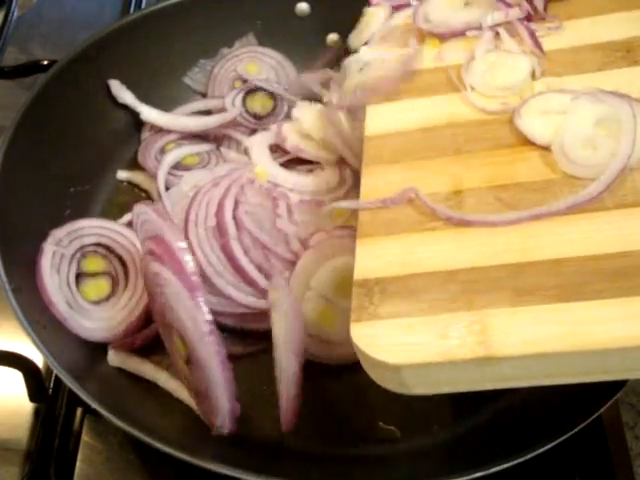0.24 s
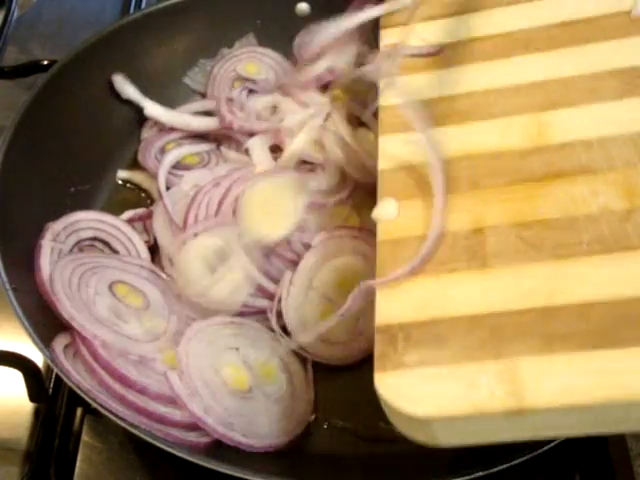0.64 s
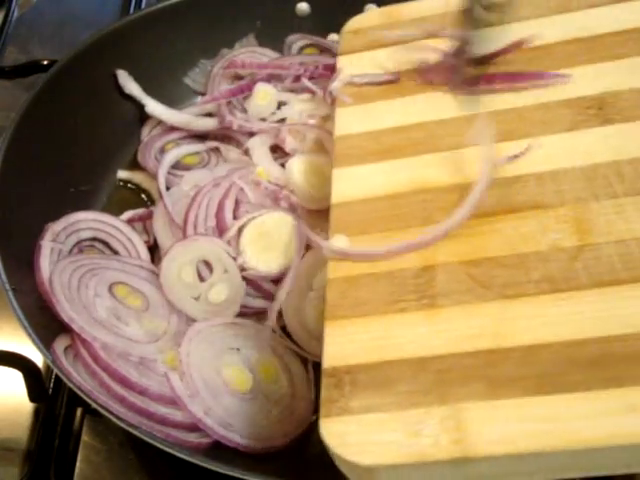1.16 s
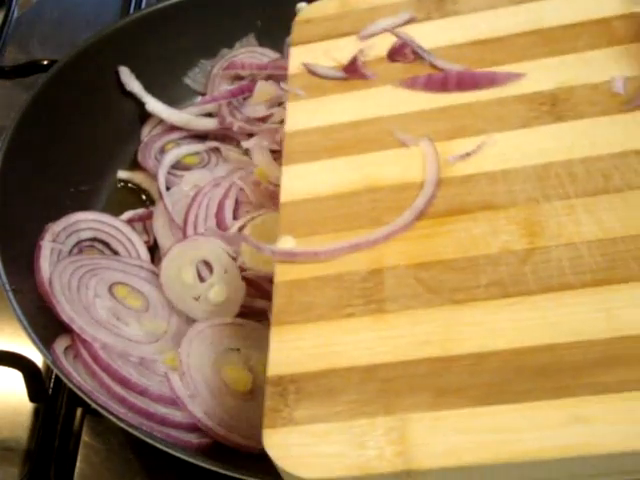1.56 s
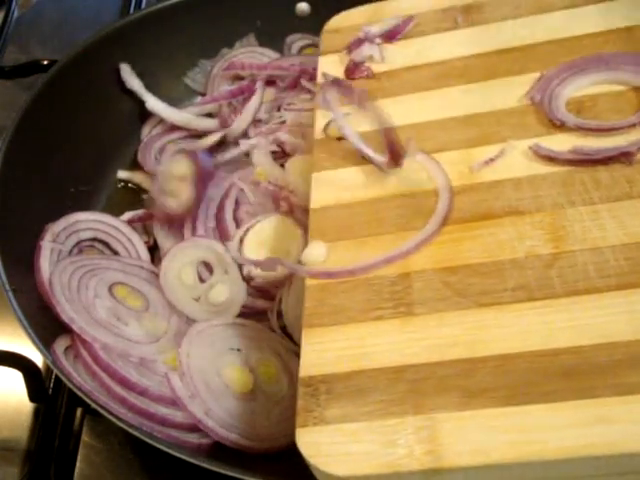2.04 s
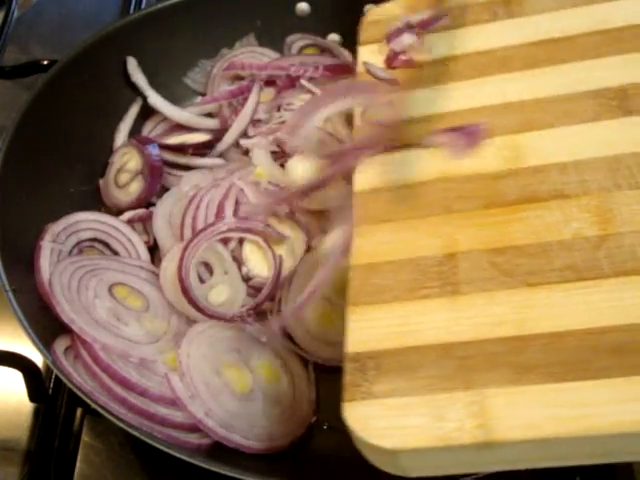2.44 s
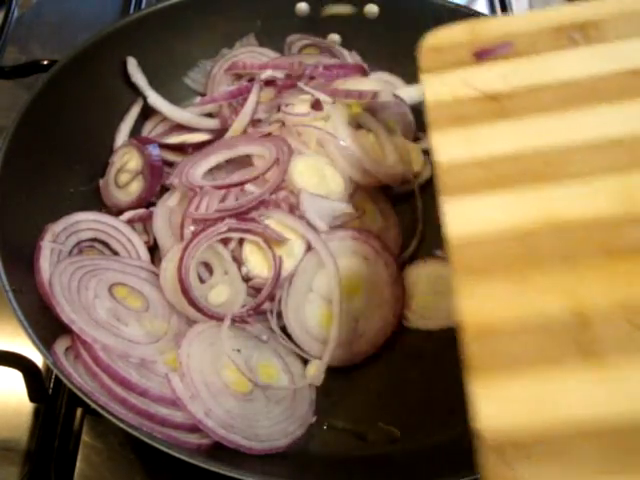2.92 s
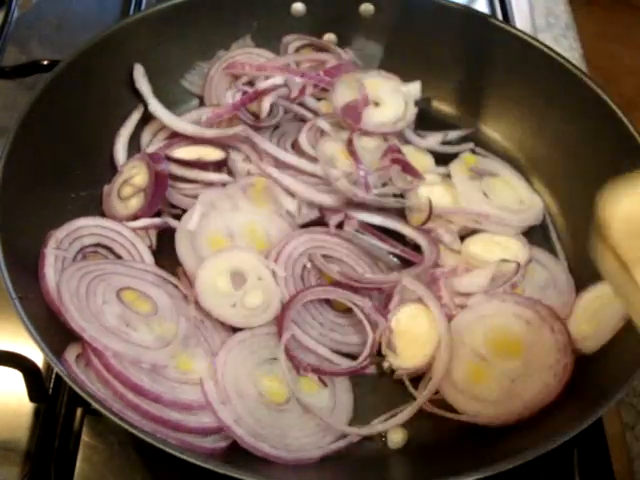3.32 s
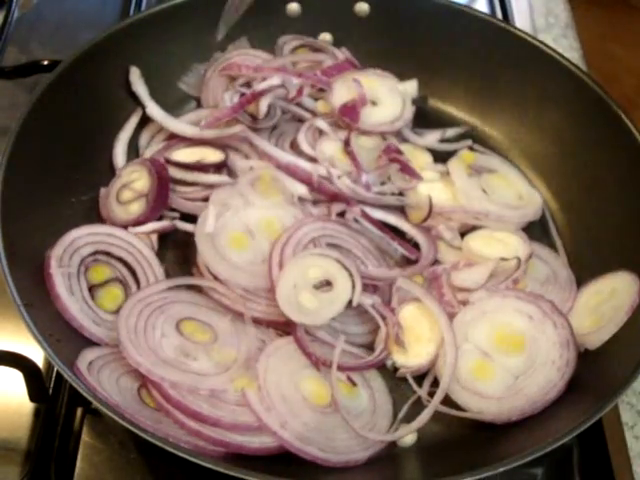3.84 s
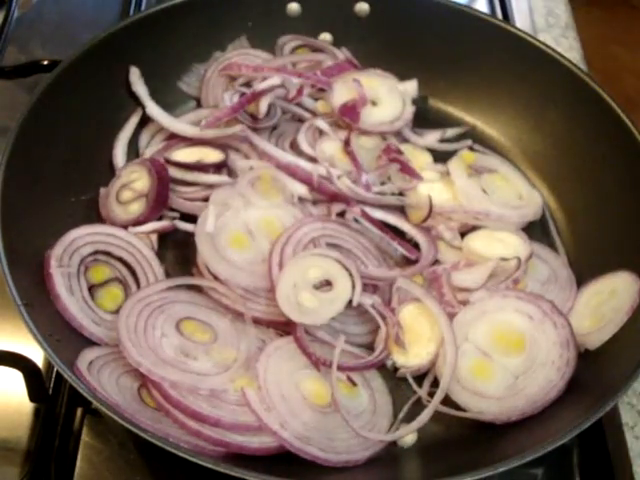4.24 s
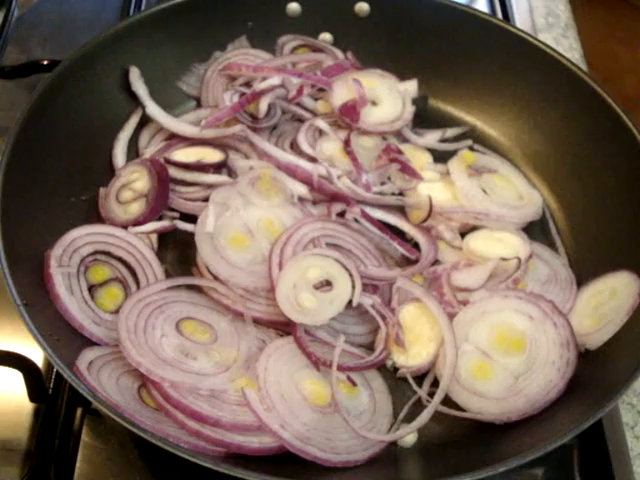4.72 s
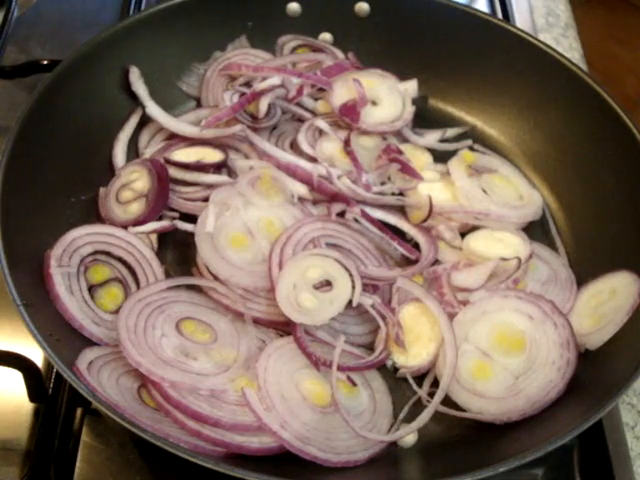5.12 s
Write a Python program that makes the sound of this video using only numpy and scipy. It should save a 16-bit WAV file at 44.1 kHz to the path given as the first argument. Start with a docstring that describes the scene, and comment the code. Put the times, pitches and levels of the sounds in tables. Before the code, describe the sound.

Hot oil sizzles softly throughout, close by in a small kitchen with a faint hush. In the first 0.4 seconds onion slices thump and slide into a frying pan, and around 0.5 seconds a knife knocks and scrapes on a wooden board. A lull follows, with faint scrapes between 1.5 and 2 seconds. From 2.3 to 3 seconds the blade knocks and scrapes loudly along the board in two bursts. Lighter knocks sound in the pan from 3.3 seconds, ending in a sharp strike at 3.7, as the sizzle becomes slightly louder and thinner. A soft swish passes near 4 seconds, then light knife clinks. At 4.7 the board knocks onto the counter and slides to rest, and the knife drags and clinks loudly from 5.1 to 5.4. A faint low ringing and stove rumble lie beneath the opening thumps and closing clatter.

```python
"""Onion slices thump into a frying pan of hot oil, pushed by a knife off a wooden board in a small kitchen.
The blade knocks and scrapes along the board; at the end knife and board are laid on the counter.
Each solid rings in its damped modes, excited by impacts and by the dense slips of friction.
Bursting bubbles make the oil sizzle softly. A low ringing murmur is faint under the sizzle, louder under
the opening thumps and closing clatter. Behind lie a room hush, one soft swish and a rumble of the hob."""
import sys
import numpy as np
from scipy import signal
from scipy.fft import irfft
from scipy.io import wavfile
from scipy.ndimage import uniform_filter1d, minimum_filter1d

SR = 44100
rng = np.random.default_rng(int(sys.argv[2]) if len(sys.argv) > 2 else 0)


def to_wav(sig):
    """Store sig (one row per channel, or 1-D mono) as 16-bit WAV at the path in sys.argv[1].

    Samples outside -1..1 are clipped; the rate is SR.
    """
    pcm = np.clip(np.atleast_2d(sig), -1, 1) * 32767
    pcm = np.round(pcm).astype(np.int16)
    wavfile.write(sys.argv[1], SR, pcm.T)  # frames by channels


N = 236640

# Resonant modes: pitch_hz, width_hz, level_db
PAN_MODES = [(165, 25, -22), (460, 40, -14), (560, 40, -10), (800, 50, 0), (860, 45, -3), (978, 40, -10),
             (1093, 40, -10), (1207, 50, -7), (1310, 50, -13), (2090, 100, -25), (2700, 100, -27)]
BOARD_MODES = [(542.8, 43, 3), (670, 71, -12), (804, 110, -6.5), (933, 140, -4), (1286, 57, 7.5),
               (1596, 26, -2), (2057, 200, -8), (2546, 41, -7), (2917, 240, -9.5), (3800, 390, -21.5)]
KNIFE_MODES = [(1305, 50, 0), (1560, 56, -12), (2050, 70, -9), (2160, 60, -8), (2270, 56, -5),
               (2700, 40, -12), (3090, 70, -7), (3600, 50, -12), (4050, 60, -16), (4550, 80, -17),
               (5190, 100, -21), (6350, 90, -24)]
COUNTER_MODES = [(288, 31, -9), (470.5, 11, 2.5), (893, 100, 1.5), (1274, 120, 4), (1610, 8.5, -23),
                 (2100, 40, 5), (2710, 330, -9), (3270, 110, -23), (3400, 61, -38)]
MURMUR_MODES = [(563, 48, -6.5), (574, 18, -10), (853, 34, 0.5), (1001, 53, -1.5), (1128, 22, -1.5),
                (1227, 150, -1), (2160, 170, -18)]
# Unpitched part of each response: frequency_hz, relative_density_db
PAN_SPECTRUM = [(40, -44.5), (150, -19.5), (311, -10.5), (560, 1.5), (810, -4), (1300, -7.5), (1960, -22),
                (4000, -30), (10000, -53)]
BOARD_SPECTRUM = [(40, -57), (150, -40), (390, -18), (550, -3), (1050, -8.5), (2000, -5.5), (3500, -10),
                  (5800, -18), (7500, -26.5), (10000, -37.5)]
KNIFE_SPECTRUM = [(40, -57), (300, -30.5), (750, -21), (1320, -0.5), (1790, -11.5), (2250, -3.5),
                  (3600, -13.5), (5340, -27), (10000, -46)]
COUNTER_SPECTRUM = [(40, -64), (100, -42), (150, -15), (283, -12), (584, 1.5), (1290, 6.5), (1830, 0),
                    (3200, -8.5), (6590, -31.5), (10000, -47.5)]
# Impacts, brighter for harder contact: start_s, peak_db, spot_pitch_hz, tilt_db_per_octave
PAN_IMPACTS = [(0.024, -17.5, 840, -4.5), (0.12, -21, 860, 3), (.137, -14, 890, 1.5), (.184, -19, 860, 3),
               (.21, -25, 860, -3), (.219, -4, 1150, 1), (.238, -16, 970, -5), (.366, -22.5, 875, 3.5),
               (0.379, -18.5, 885, -2.5), (.769, -30.5, 960, 6), (3.27, -22.5, 860, -6.5),
               (3.381, -13, 900, -0.5), (3.543, -19.5, 1060, 7.5), (3.55, -24, 165, -3),
               (3.693, -27, 820, 6), (3.721, 0.5, 850, 2.5), (3.823, -13, 820, -3.5)]
BOARD_IMPACTS = [(.433, -10, 555, -2), (.46, -8.5, 3370, 2), (.472, -5.5, 1320, 1), (.505, -10.5, 2428, 2),
                 (2.292, -13, 580, -9.5), (2.354, -13.5, 1990, 1), (2.385, -8, 554, -5),
                 (2.391, -1, 1370, -3), (2.42, -3.5, 1330, -4), (2.465, -11.5, 790, -2.5),
                 (2.599, -9.5, 5400, 6), (2.852, -1, 1230, 1)]
KNIFE_IMPACTS = [(3.793, -12, 2940, 16.5), (4.139, -36, 1550, -4), (4.294, -22.5, 1960, 1),
                 (4.411, -14.5, 1960, -3.5), (4.43, -24, 2080, 8.5), (4.601, -22, 4700, 5),
                 (4.619, -23, 2540, -6.5), (4.919, -5, 6300, 15), (5.133, -16.5, 2250, 9),
                 (5.159, -11.5, 1320, 4.5), (5.229, 1, 1270, 1), (5.332, -1.5, 1250, 1.5),
                 (5.348, -5, 3140, 4)]
COUNTER_IMPACTS = [(4.732, 0, 1220, -2), (4.752, -30, 1260, 4), (4.796, -2, 291, -5),
                   (4.919, -9.5, 1400, 3)]
# Sliding contacts: start_s, length_s, first_level_db, last_level_db, tilt_db_per_octave
PAN_STROKES = [(0, 0.078, -32, -34, 3), (0.119, 0.46, -40, -39, -1), (3.2, 0.17, -34.5, -47, 3),
               (3.54, 0.12, -32, -34, 2)]
BOARD_STROKES = [(0.438, 0.08, -19.5, -23, -1), (.525, 0.13, -33, -39, 1.5), (1.55, 0.13, -35.5, -59, -2.5),
                 (1.7, 0.25, -39, -51, -0.5), (2.325, .03, -29, -18.5, -6.5),
                 (2.357, 0.027, -26, -23, -1.5), (2.385, .12, -16, -21, -2.5), (2.5, 0.1205, -21.5, -25, 1),
                 (2.853, 0.0603, -17.5, -18, 2.5), (2.915, 0.06, -18, -38, -2)]
KNIFE_STROKES = [(4.302, 0.089, -35, -49, -1), (4.421, 0.19, -35.5, -43, -0.5),
                 (4.6, 0.084, -38, -51, 12.5), (5.11, .06, -29, -16.5, -1.5), (5.176, 0.0554, -30, -11, -1),
                 (5.235, .09, -16, -25, 2), (5.335, 0.043, -15, -32, 1)]
COUNTER_STROKES = [(4.741, 0.06, -14.5, -24.5, 0.28), (4.797, 0.16, -14.5, -34.5, -2.1),
                   (4.894, 0.28, -17, -37, -1.2)]
# Levels of the sizzle and of the low ringing murmur: time_s, sizzle_db, murmur_db
ENVELOPES = [(0, -43.5, -35.5), (.4, -47.5, -54.5), (1.3, -47, -49), (2.4, -48.5, -53.5),
             (2.8, -47.5, -52.5), (3.1, -45, -49.5), (3.55, -42, -56), (3.68, -36.5, -48.5),
             (4.0, -40.5, -56.5), (4.6, -40, -56.5), (5.37, -43.5, -32.5)]
# Noise spectra: frequency_hz, relative_density_db
BARE_OIL_SPECTRUM = [(880, -20), (1500, 0), (2090, 1), (3580, 0), (5090, 2), (5660, 3), (7500, -3),
                     (10000, -8)]
COVERED_OIL_SPECTRUM = [(820, -53), (1500, -24.5), (2460, -7), (4190, -9), (5300, -4), (6550, -1.5),
                        (8000, -9), (10000, -15.5)]
SWISH_SPECTRUM = [(1060, -21.5), (1800, -5), (2140, 2), (2680, -1.5), (3020, 2), (3630, 3.5), (4320, -8.5),
                  (5000, -12.5), (6500, -49), (11000, -120)]
RUMBLE_SPECTRUM = [(20, -20), (50, -10), (110, -2.5), (165, -2), (260, 2), (400, -36)]
HUSH_SPECTRUM = [(12, -54.5), (20, -62), (287, -9.5), (339, -11.5), (494, -4.5), (736, -9), (853, -4.5),
                 (1220, -13), (1470, -11.5), (3000, -11), (3900, -13), (6600, -120)]
# Reverberation time of the kitchen: frequency_hz, t60_s
ROOM_DECAY = [(150, 0.64), (600, 0.38), (2000, 0.46), (5000, 0.14), (10000, 0.035)]

SPREADING_S = (3.32, 3.61)  # the slices are spread over the oil: start_s, end_s
TAPS = 4096
FILTER_HZ, TIME_S = np.fft.rfftfreq(2 * TAPS, 1 / SR), np.arange(N) / SR


def slices_in_pan():
    """Impact and friction: slices and blade land and slide in the pan, exciting its modes."""
    pan = (PAN_MODES, PAN_SPECTRUM, -6)
    thumps = impacts(pan, PAN_IMPACTS, rattle_t60_s=0.036, looseness=0.06)
    return thumps + friction(pan, PAN_STROKES, slips_per_s=1500, brightening=0.1)


def blade_on_board():
    """Impact and friction: the blade knocks and scrapes, driving the damped modes of the wood."""
    board = (BOARD_MODES, BOARD_SPECTRUM, -6.5)
    knocks = impacts(board, BOARD_IMPACTS, rattle_t60_s=0.036, looseness=0.31)
    return knocks + friction(board, BOARD_STROKES, slips_per_s=5500, brightening=4)


def knife_laid_down():
    """Modal vibration: the knife rings as it touches down and drags on the counter."""
    knife = (KNIFE_MODES, KNIFE_SPECTRUM, -2.1)
    clinks = impacts(knife, KNIFE_IMPACTS, rattle_t60_s=0.035, looseness=0.15)
    return clinks + friction(knife, KNIFE_STROKES, slips_per_s=4000, brightening=0.56)


def board_on_counter():
    """Impact and friction: the board strikes the counter and slides to rest."""
    counter = (COUNTER_MODES, COUNTER_SPECTRUM, -5.5)
    knocks = impacts(counter, COUNTER_IMPACTS, rattle_t60_s=0.064, looseness=0.093)
    return knocks + friction(counter, COUNTER_STROKES, slips_per_s=3000, brightening=0.1)


def impacts(solid, blows, rattle_t60_s, looseness):
    """Impulse excitation: each blow is a tick and a decaying rattle, filtered by the solid."""
    out, t = np.zeros(N), TIME_S[:TAPS]
    envelope = gain_of(-60 * t / rattle_t60_s) * (1 - np.exp(-t / 0.0007))
    for start_s, peak_db, spot_hz, tilt_db in blows:
        force = looseness * rng.standard_normal(TAPS) * envelope
        force[0] = max(1 - 3.65 * looseness, 0)  # a loose contact has no clean tick
        sound = signal.fftconvolve(force, modal_response(*solid, tilt_db, spot_hz, spot_db=5))
        add(out, start_s, gain_of(peak_db) * sound / abs(sound).max())
    return out


def friction(solid, strokes, slips_per_s, brightening):
    """Stick-slip friction: dense slips drive the solid. Brightening is in dB per octave over a stroke."""
    out = np.zeros(N)
    dull, bright = modal_response(*solid, tilt_db=-8), modal_response(*solid, tilt_db=8)
    for start_s, length_s, first_db, last_db, tilt_db in strokes:
        progress = np.linspace(0, 1, round(length_s * SR))
        slips = impulses(SR // 2, slips_per_s, spread_db=3.7)[:len(progress)]
        slips *= signal.windows.tukey(len(progress), 0.1)
        slips *= gain_of(first_db + (last_db - first_db) * progress)
        bright_share = np.clip((tilt_db + brightening * progress) / 16 + 0.5, 0, 1)
        add(out, start_s, signal.fftconvolve(slips * (1 - bright_share), dull))
        add(out, start_s, signal.fftconvolve(slips * bright_share, bright))
    return out


def modal_response(modes, spectrum, spectrum_db, tilt_db=0, spot_hz=1000, spot_db=0):
    """Modal superposition: damped resonances over a broad spectrum, tilted by contact hardness."""
    hz = FILTER_HZ
    power = gain_of(curve_at(spectrum, hz) + spectrum_db) ** 2
    for pitch_hz, width_hz, level_db in modes:
        radiation = np.minimum((hz + 1) / pitch_hz, 1) ** 4  # small things radiate little bass
        power += radiation * gain_of(level_db) ** 2 / (1 + abs(2 * (hz - pitch_hz) / width_hz) ** 3)
    # the struck spot favours the modes within about 0.3 octave of one pitch
    emphasis_db = spot_db * np.exp(-(np.log2((hz + 1) / spot_hz) / 0.3) ** 2)
    slope_db = tilt_db * np.log2((hz + 200) / 1200)
    response = minimum_phase(10 * np.log10(power) + slope_db + emphasis_db)
    return response / np.linalg.norm(response)


def sizzle():
    """Bubble bursts: the hot oil gives a dense fizz with sharper spits."""
    times_s, sizzle_db, _ = np.transpose(ENVELOPES)
    fizz = oil_fizz()
    spits = coloured(impulses(N, per_s=1100, spread_db=5.3), BARE_OIL_SPECTRUM)
    return fade(times_s, sizzle_db) * unit_rms(fizz + fade(SPREADING_S, [-7, -16]) * spits)


def oil_fizz():
    """Incoherent summation: bursts merge into noise, whose spectrum shifts as slices cover the oil."""
    frames_s, hz = np.arange(N // 128 + 5) * 128 / SR, np.fft.rfftfreq(512, 1 / SR)
    covered = np.interp(frames_s, SPREADING_S, [0, 1])
    level_db = np.outer(curve_at(BARE_OIL_SPECTRUM, hz), 1 - covered)
    level_db += np.outer(curve_at(COVERED_OIL_SPECTRUM, hz), covered)
    real, imaginary, patches = rng.standard_normal((len(frames_s), len(hz), 3)).T
    # the level drifts in patches of 6 bins by 12 frames
    patches = unit_rms(uniform_filter1d(uniform_filter1d(patches, 6, 0), 12, 1))
    spectra = (real + 1j * imaginary) * gain_of(level_db + 2.1 * patches)
    return unit_rms(signal.istft(spectra, nperseg=512, noverlap=384)[1][:N])


def murmur():
    """Resonance: a low ringing, faint under the sizzle, louder at the opening and the close."""
    times_s, _, murmur_db = np.transpose(ENVELOPES)
    clicks = impulses(N, per_s=1400, spread_db=1.8)
    ringing = signal.oaconvolve(clicks, modal_response(MURMUR_MODES, HUSH_SPECTRUM, -25))[:N]
    return fade(times_s, murmur_db) * ringing


def reverberation(direct):
    """Room reverberation: sparse reflections of random sign, each band decaying at its own rate."""
    reflections = np.zeros(SR // 2)
    slots = np.arange(200, len(reflections) - 20, 20)
    reflections[slots + rng.integers(0, 20, len(slots))] = rng.choice([-1., 1.], len(slots))
    hz, t, spectra = signal.stft(reflections, SR, nperseg=256)
    decay = gain_of(-60 * t / curve_at(ROOM_DECAY, hz)[:, None])
    tail = signal.istft(spectra * decay, SR, nperseg=256)[1]
    return signal.fftconvolve(direct, tail / np.linalg.norm(tail))[:N]


def swish():
    """Amplitude modulation: a band of noise swells and fades once."""
    level_db = np.interp(TIME_S, [3.8, 3.95, 4.14], [-40.5, -36.5, -57.5], left=-120, right=-120)
    return gain_of(level_db) * noise(SWISH_SPECTRUM)


def hob_rumble(contacts, ring_s=0.07):
    """Structure-borne sound: a low rumble follows the energy of the contacts on pan and counter."""
    retention = np.exp(-1 / (ring_s * SR))
    shake = np.sqrt(signal.lfilter([1 - retention], [1, -retention], contacts ** 2))
    return (gain_of(-68.5) + gain_of(-28.5) * shake) * noise(RUMBLE_SPECTRUM)


def room_hush():
    """Stationary noise: the steady, faint background of the kitchen."""
    return gain_of(-51.5) * noise(HUSH_SPECTRUM)


def impulses(count, per_s, spread_db):
    """Poisson process: clicks of random time and sign, a few of them large."""
    size, sign, chance = rng.random((count, 3)).T
    amplitude = gain_of(spread_db * np.minimum(-np.log(size + 1e-9), 5))
    return unit_rms(amplitude * np.sign(sign - 0.5) * (chance < per_s / SR))


def noise(spectrum):
    """Spectral shaping of white Gaussian noise."""
    return coloured(rng.standard_normal(N), spectrum)


def coloured(source, spectrum):
    """Linear filtering by a spectrum, scaled to unit RMS."""
    return unit_rms(signal.oaconvolve(source, minimum_phase(curve_at(spectrum, FILTER_HZ)))[:N])


def minimum_phase(level_db):
    """Causal impulse response: the Hilbert transform of the log gain gives the phase."""
    log_gain = np.log(gain_of(np.maximum(level_db, -100)))
    mirrored = np.concatenate([log_gain, log_gain[-2:0:-1]])
    transfer = np.exp(np.conj(signal.hilbert(mirrored)))
    return irfft(transfer[:len(level_db)])[:TAPS]


def curve_at(points, hz):
    """Interpolation on a logarithmic frequency axis."""
    points_hz, values = np.transpose(points)
    return np.interp(np.log(hz + 1), np.log(points_hz + 1), values)


def fade(times_s, levels_db):
    """Amplitude envelope, piecewise linear in decibels."""
    return gain_of(np.interp(TIME_S, times_s, levels_db))


def gain_of(db):
    """Amplitude ratio of a level in decibels."""
    return 10 ** (np.asarray(db) / 20)


def unit_rms(x):
    """Normalisation to unit mean power."""
    return x / np.sqrt(np.mean(x ** 2) + 1e-20)


def add(mix, start_s, sound):
    """Superposition of a delayed sound on the mix."""
    part = mix[round(start_s * SR):][:len(sound)]
    part += sound[:len(part)]


def scene():
    """Superposition of the contact sounds, their reverberation, the sizzle and the background, in mono."""
    board, pan = blade_on_board(), slices_in_pan()
    knife, counter = knife_laid_down(), board_on_counter()
    direct = board + pan + knife + counter
    cooking = direct + gain_of(-8) * reverberation(direct) + sizzle()
    background = murmur() + swish() + hob_rumble(pan + counter) + room_hush()
    return (cooking + background)[None]


def record(dry):
    """The level dips briefly just before each sudden attack; saturation and a low-pass follow."""
    level_db = 10 * np.log10(abs(uniform_filter1d(dry ** 2, size=96)) + 1e-12)
    peak_ahead_db = -minimum_filter1d(-level_db, size=551, origin=-275)  # over the next 12.5 ms
    duck_db = 1.1 * np.maximum(peak_ahead_db - level_db - 24.5, 0)
    ducked = dry / gain_of(uniform_filter1d(duck_db, size=32))
    saturated = 0.94 * np.tanh(ducked / 0.89)
    low_pass = signal.firwin(1535, cutoff=10080, window=("kaiser", 9), fs=SR)
    return signal.oaconvolve(saturated, low_pass[None], "same")


dry = scene()
out = record(dry)
to_wav(out)
```